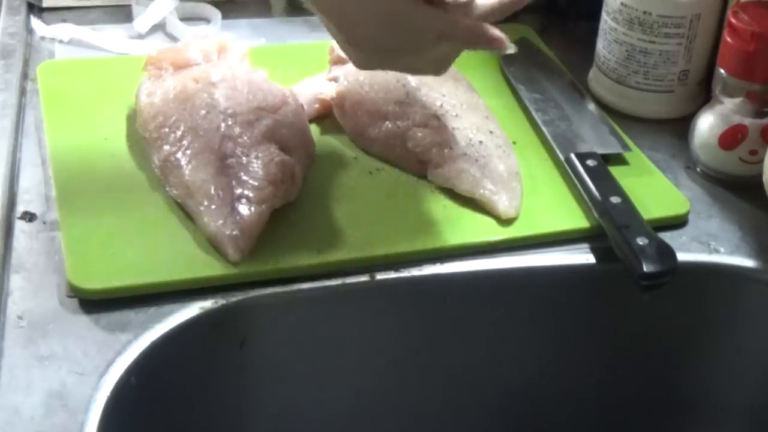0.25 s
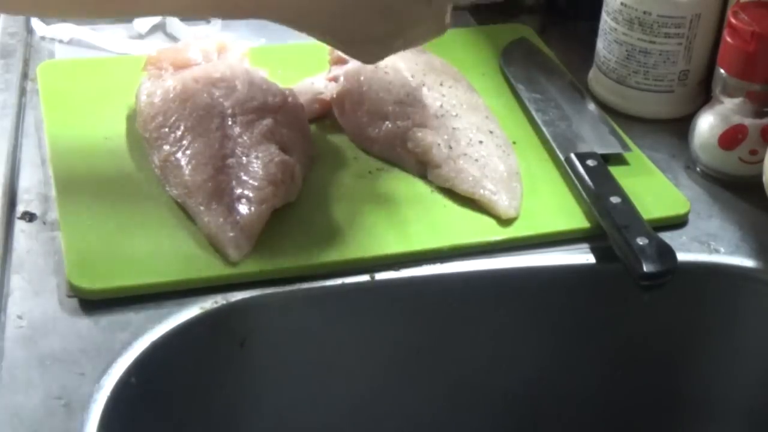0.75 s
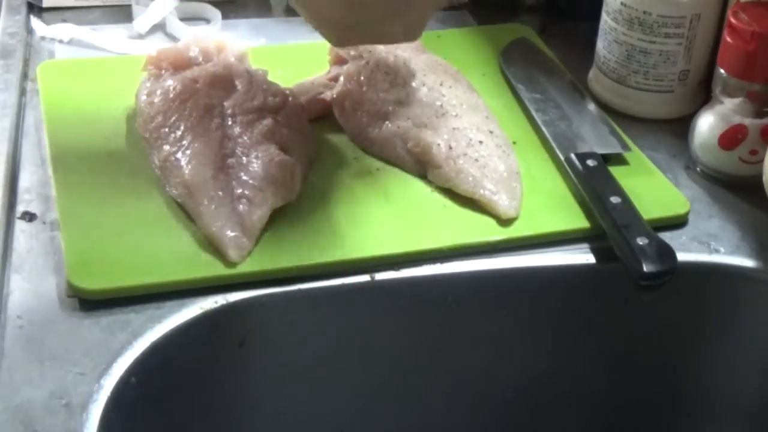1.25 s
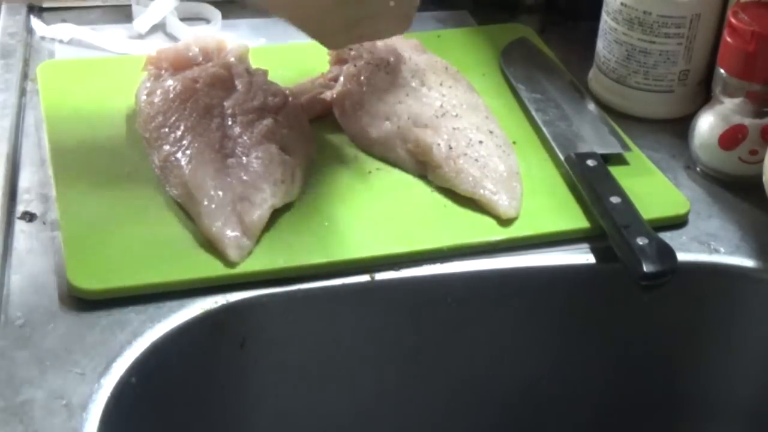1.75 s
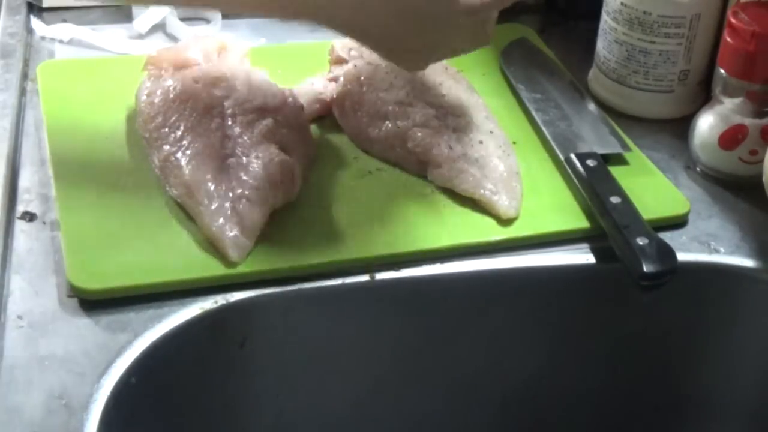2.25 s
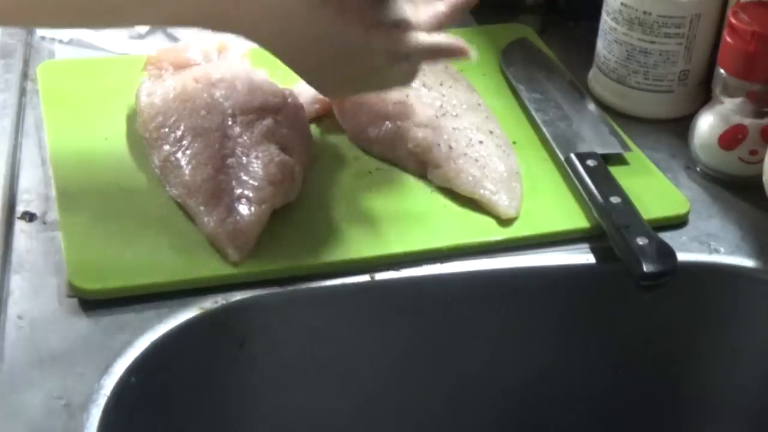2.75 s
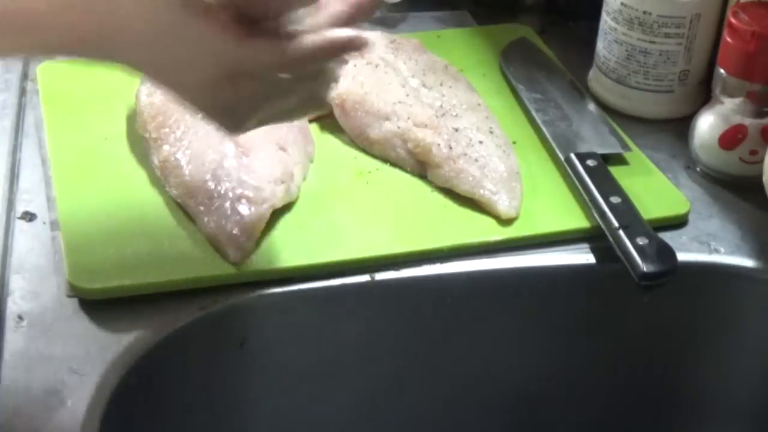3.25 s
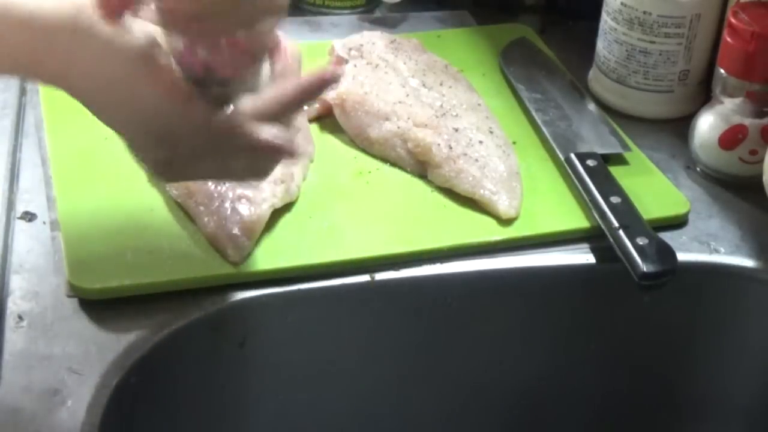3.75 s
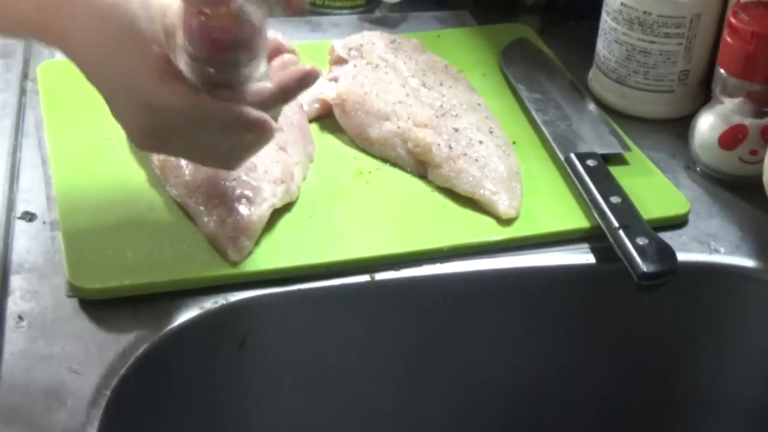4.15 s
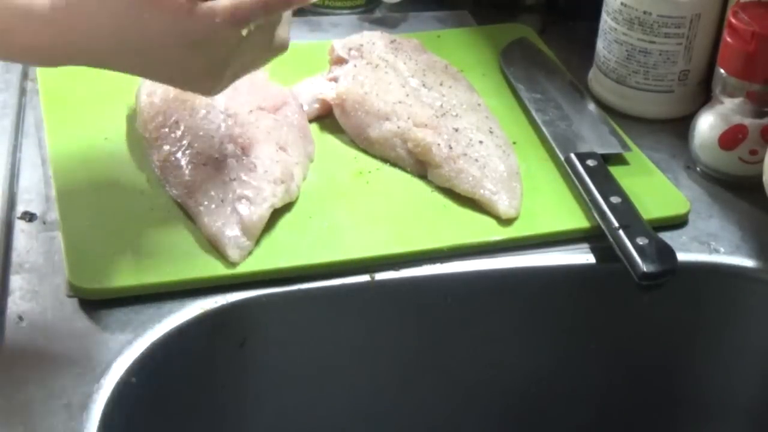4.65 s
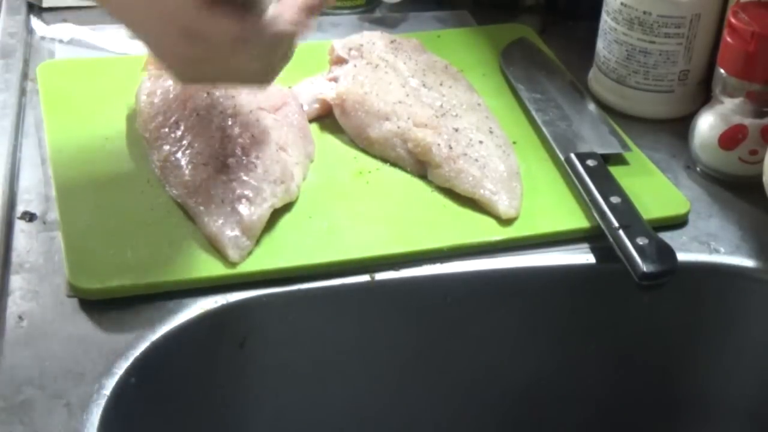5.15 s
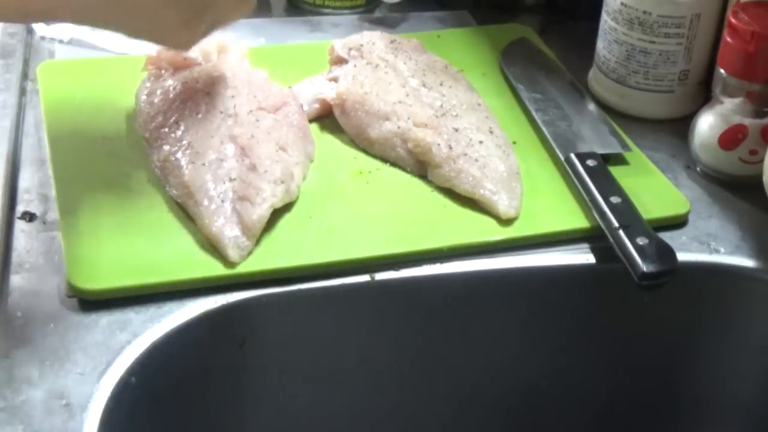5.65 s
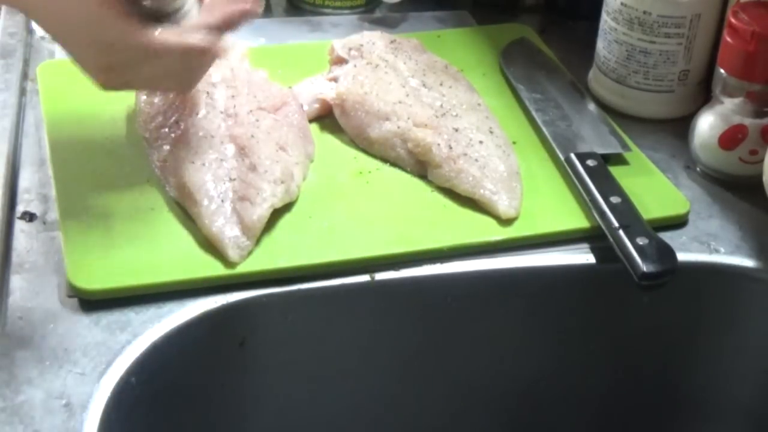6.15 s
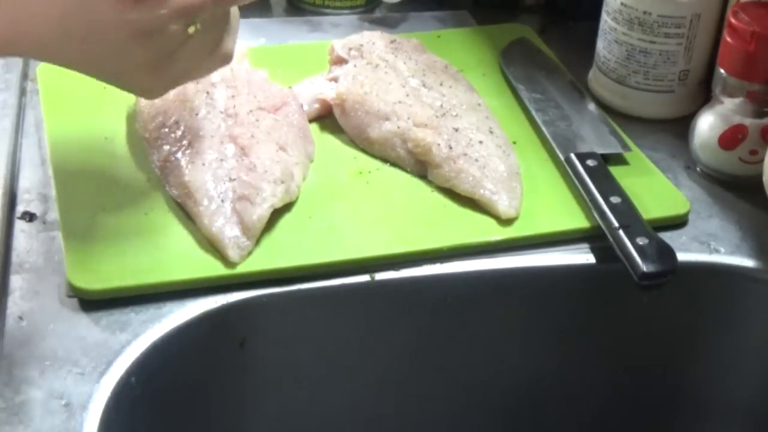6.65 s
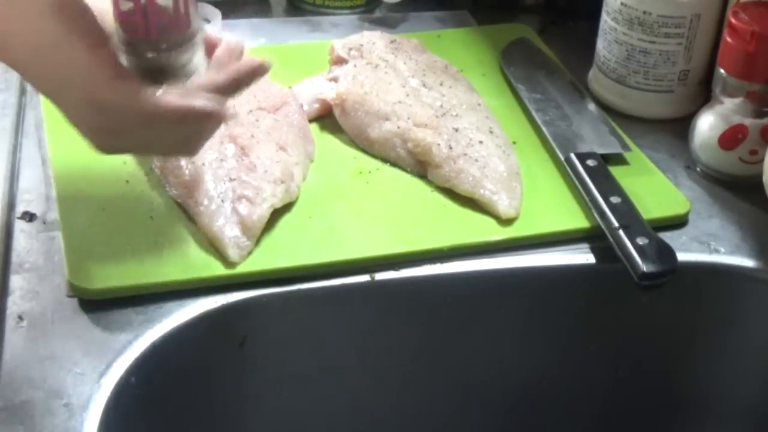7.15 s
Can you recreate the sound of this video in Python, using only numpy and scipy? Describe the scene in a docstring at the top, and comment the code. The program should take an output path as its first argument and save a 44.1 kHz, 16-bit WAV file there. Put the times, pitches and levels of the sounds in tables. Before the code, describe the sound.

A seasoning shaker rattles rhythmically from start to end. Hard grains pelt the inside of the can in crisp, high-pitched bursts under a tenth of a second long, then settle with stray ticks. In the first half, faint sliding leads into each stroke; later the gaps are cleaner and the strokes slightly slower. Close microphone, dry small kitchen, low hum and quiet air noise behind.

```python
"""A metal shaker can is shaken about three times a second over a kitchen counter.
From the start, filtered noise and a wavering appliance hum lie under soft stray ticks of grain.
Before each downstroke random impacts slide along the wall; a few grains click, or roll on a thin note.
Each downstroke pelts the end: noise bursts excite a bright wall and a hollow end and air cavity.
Grains then settle, one drops lightly, and at times the cap chinks; echoes and a short tail answer all."""
import sys
import numpy as np
from scipy import signal
from scipy.fft import rfft, irfft
from scipy.io import wavfile

SR = 44100
rng = np.random.default_rng(int(sys.argv[2]) if len(sys.argv) > 2 else 0)


def dump(signal):
    """Clip the signal to [-1, 1] and save it as 16-bit WAV at the path in sys.argv[1]."""
    limited = np.clip(np.atleast_2d(signal).T, -1, 1)
    pcm = np.round(limited * 32767).astype(np.int16)
    wavfile.write(sys.argv[1], SR, pcm)


N = 325879
T = np.arange(N) / SR  # time axis, s


def amp(db):
    """Level definition: decibels to an amplitude ratio."""
    return 10 ** (np.asarray(db) / 20)


def evened(x):
    """Power normalisation: scales to rms 1."""
    return x / np.sqrt(np.mean(x ** 2) + 1e-20)


def unit(x):
    """Energy normalisation: scales to energy 1."""
    return x / np.linalg.norm(x)


def read(points, hz):
    """Linear interpolation on a logarithmic frequency axis."""
    f, value = np.transpose(points)
    return np.interp(np.log(hz + 1), np.log(f), value)


def over_time(points):
    """Linear interpolation of a (t, value) table over the whole scene."""
    return np.interp(T, *np.transpose(points))


def add(mix, s, sound):
    """Superposition: mixes a sound in at time s, or at zero if s is negative."""
    part = mix[max(round(s * SR), 0):][:len(sound)]
    part += sound[:len(part)]


def through(x, response):
    """Linear filtering: convolution with an impulse response."""
    return signal.oaconvolve(x, response)[:N]


def colour(points, peaks=(), size=2048):
    """Minimum phase: a causal response of energy 1 from a spectrum and peaks (f/Hz, width/Hz, lift/dB)."""
    hz = abs(np.fft.fftfreq(size, 1 / SR))
    db = read(points, hz)
    for centre, width, lift in peaks:
        db = db + lift / (1 + (2 * (hz - centre) / width) ** 2)
    # the Hilbert transform of the log magnitude gives the phase
    log_spectrum = np.conj(signal.hilbert(np.log(amp(db))))
    return unit(np.fft.ifft(np.exp(log_spectrum)).real)


def moving(x, response, size=900):
    """Time-variant filtering: as the can moves and turns, its response fades into new random patterns."""
    out, padded = np.zeros(N + size), np.pad(x, (size, 2 * size))
    fade = np.sin(np.pi * np.arange(2 * size) / (2 * size))
    for i in range(0, N + size, size):
        block = padded[i:i + 2 * size] * fade
        add(out, i / SR, signal.fftconvolve(block, response()))
    return out[size:]


def whistle(hz, width_hz, n):
    """Random excitation of a resonance: a complex band of noise from a double-pole low-pass, shifted to hz, rms
    1."""
    r = np.exp(-np.pi * width_hz / SR)
    noise = rng.standard_normal(n) + 1j * rng.standard_normal(n)
    slow = signal.lfilter([1], [1, -2 * r, r * r], noise)
    return evened((slow * np.exp(2j * np.pi * hz * T[:n])).real)


def burst(decay, rise=0.00013, size=600):
    """High modal density: one hit is noise with a fast rise and an exponential decay (both s)."""
    t = T[:size]
    envelope = np.exp(-t / decay) * (1 - np.exp(-t / rise))
    return unit(rng.standard_normal(size) * envelope)


def pelting(length, per_s, spread_db):
    """Random impact process: grains at random moments with uneven force, rms 1."""
    n = max(round(length * SR), 100)
    chance, force = rng.random(n), rng.exponential(1, n)
    return evened((chance < per_s / SR) * amp(spread_db * np.minimum(force, 3)))


def strike(impacts, decay, count=120):
    """Position-dependent excitation: each impact lands on one of many spots of the can."""
    spot = rng.integers(0, count, N)
    bursts, out = [burst(decay) for _ in range(count)], np.zeros(N)
    for i in np.flatnonzero(impacts):
        add(out, i / SR, impacts[i] * bursts[spot[i]])
    return out


# spectrum of the room noise: (f/Hz, relative level per Hz/dB)
AIR_SPECTRUM = [(25, -23), (60, 0), (90, -8), (160, 0.5), (225, -8), (290, -0.5), (500, -12), (900, -6.5),
                (1500, -10), (3000, -16.5), (6000, -17.5), (10000, -12), (15000, -33)]
# partials of the appliance hum: (f/Hz, rms level before the swell/dB)
HUM_PARTIALS = [(58.1, -60), (116.1, -63.5), (622, -68.5), (725, -82)]
# slow swell of room noise and hum: (t/s, gain/dB)
BACKGROUND_SWELL = [(0, 3), (.8, -2), (2.2, -1.5), (3, 3.5), (4, 0.5), (7.4, 2.5)]


def background(air_db=-55.5, waver=0.024):
    """Noise shaping and phase modulation: soft room noise and a slightly wavering hum."""
    spectrum = rfft(rng.standard_normal(N)) * amp(read(AIR_SPECTRUM, np.fft.rfftfreq(N, 1 / SR)))
    air = evened(irfft(spectrum, N))
    drift = evened(sum(np.sin(2 * np.pi * (f * T + rng.random())) for f in np.geomspace(.2, 3, 12)))
    hum = np.zeros(N)
    for hz, db in HUM_PARTIALS:
        # waver is the rms phase excursion of the lowest partial, in radians
        wander = waver * np.sqrt(hz / HUM_PARTIALS[0][0]) * drift
        hum += amp(db) * evened(np.sin(2 * np.pi * (hz * T + rng.random()) + wander))
    return (amp(air_db) * air + hum) * amp(over_time(BACKGROUND_SWELL))


# course of the soft low rustle: (t/s, level/dB)
RUSTLE_LEVEL = [(0, -62), (.4, -56.5), (.7, -77), (1.9, -61.5), (2.6, -70), (4.4, -61.5), (6.3, -55.5),
                (6.8, -67), (7.4, -57)]


def rustle(low_hz=165, high_hz=290, high_db=-4):
    """Amplitude modulation of narrow-band noise: two dull bands rise and fall."""
    dull = evened(whistle(low_hz, 80, N) + amp(high_db) * whistle(high_hz, 92, N))
    return dull * amp(over_time(RUSTLE_LEVEL))


def stray_grains(wall_db=-54, hollow_db=-69):
    """Sparse random excitation: loose grains never quite rest and tick softly throughout."""
    ticks = pelting(N / SR, per_s=260, spread_db=5)
    return ticks * amp(wall_db), ticks * amp(hollow_db)


# downstrokes: (start t/s, end t/s, wall level/dB, hollow level/dB, build-up through the stroke/dB,
# level of the slide before it/dB, level of the opening hit/dB); levels are relative, before later gains
DOWNSTROKES = [(0.071, 0.156, -21.5, -32, -9, -36, -14.5), (0.364, 0.424, -22, -30.5, 2, -39.5, -13.5),
               (0.648, 0.731, -22.5, -32, 1.5, -38.5, -13), (0.95, 1.02, -23.5, -32.5, 5.5, -42.5, -17.5),
               (1.294, 1.342, -23, -35.5, -5.5, -42, -23), (1.597, 1.671, -27, -34, 2.5, -41, -18),
               (1.923, 1.999, -23.0, -31.5, 4, -41.5, -17), (2.235, 2.311, -24.5, -37.5, 3, -37.5, -14),
               (2.579, 2.668, -24.5, -34.0, 2.5, -39.5, -13), (2.945, 3.009, -23, -31, -5.5, -39, -18),
               (3.267, 3.347, -19.5, -34, -0.5, -37.0, -18), (3.607, 3.693, -20, -33.5, 1, -68, -20),
               (3.982, 4.036, -23.5, -30.0, -1.0, -56, -25), (4.273, 4.386, -22.5, -32.5, -2.5, -53, -14),
               (4.592, 4.69, -21, -31.5, 1, -71, -16), (4.913, 4.988, -20, -28.5, 3, -50, -19.5),
               (5.243, 5.332, -22.0, -28.5, -8.5, -72, -18.5), (5.549, 5.643, -22.0, -31.5, 5, -73, -12),
               (5.898, 5.991, -20.5, -31.5, -0.5, -65, -12.5), (6.226, 6.323, -23, -33.5, -0.5, -65, -10),
               (6.578, 6.667, -21.0, -31.5, 0.0, -63, -18), (6.91, 7.019, -21.5, -34.5, 2.5, -52.5, -15),
               (7.26, 7.338, -26, -35.5, 2.5, -74, -23)]
# the slide before each downstroke begins and ends this long ahead of it, s
SLIDE_FROM_S, SLIDE_UNTIL_S = .135, 0.043


def slides(wall_db=-0.5, hollow_db=-8.0):
    """Sliding friction as dense impacts: on the way back grains gather speed and run out."""
    out = np.zeros(N)
    for start, *_, slide_db, _ in DOWNSTROKES:
        begin = max(start - SLIDE_FROM_S, 0)
        hits = pelting(start - SLIDE_UNTIL_S - begin, per_s=1100, spread_db=5)
        add(out, begin, hits * signal.windows.tukey(len(hits), .25) * amp(slide_db))
    return out * amp(wall_db), out * amp(hollow_db)


def slide_hits(wall_db=7, hollow_db=-2, spread_db=3, count=2):
    """Isolated impacts: larger grains tick out of each slide; rows (t/s, wall/dB, hollow/dB)."""
    rows = []
    for start, *_, slide_db, _ in DOWNSTROKES:
        times_ahead = rng.uniform(SLIDE_UNTIL_S, SLIDE_FROM_S, count)
        sizes_db = spread_db * rng.standard_normal(count)
        for ahead, size in zip(times_ahead, sizes_db):
            if start > ahead:
                rows.append((start - ahead, slide_db + wall_db + size, slide_db + hollow_db + size))
    return rows


# tightening of the hand on the can: (t/s, grip from 0 loose to 1 tight)
HAND_GRIP = [(0, 0.056), (3.1, 0.25), (3.6, 1)]


def rolls(lead_s=.105, length_s=0.081, tight_db=-52, loose_db=-30):
    """Rolling contact as impacts: grains roll before each downstroke, much fainter with a loose grip."""
    out = np.zeros(N)
    for start, *_ in DOWNSTROKES:
        ticks = pelting(length_s, per_s=450, spread_db=4)
        looseness = 1 - np.interp(start, *np.transpose(HAND_GRIP))
        level = amp(tight_db + loose_db * looseness)
        add(out, start - lead_s, level * evened(ticks * np.hanning(len(ticks))))
    return out


# spectrum of a hit on the wall: (f/Hz, relative level/dB)
WALL_SPECTRUM = [(3500, -36.5), (5200, -15.5), (5950, -3), (7000, -0.5), (8000, 0), (9000, -1), (10200, -5),
                 (11800, -5.5), (13000, -10), (14000, -14), (15800, -16)]


def rolling_ticks(note_hz=6400, note_decay=0.0027, note_db=-1, scratch_db=-3):
    """Excitation of a single mode: rolling grains tick on one thin wall note, with a broad scratch."""
    rolling, t = rolls(), T[:SR // 40]
    note = unit(np.cos(2 * np.pi * note_hz * t) * np.exp(-t / note_decay))
    scratch = through(strike(rolling, decay=.0005), colour(WALL_SPECTRUM))
    return amp(note_db) * through(rolling, note) + amp(scratch_db) * scratch


# spectrum of a hit on the end of the can: (f/Hz, relative level/dB)
HOLLOW_SPECTRUM = [(100, -22.5), (250, -18), (430, -13), (540, -20), (800, -17), (1170, -14), (1500, -9.5),
                   (2000, -6.5), (2450, -2), (2900, -1.5), (3500, -1.5), (4400, -5), (5300, -6),
                   (8000, -22)]
# resonances of the air in the can: (f/Hz, width/Hz, lift with loose grip/dB, lift with tight grip/dB)
AIR_CAVITY = [(730, 43, 7.5, 10.5), (966, 200, 7, 10.5), (1382, 200, 7, 5.5), (1718, 76, 8, 3.5),
              (1940, 410, 8, 2.5), (2684, 85, 10, 6), (3020, 116, 7, 6), (3346, 140, 7, 3),
              (3620, 59, 8.5, -1), (3920, 110, 6.5, 1.5)]


def can(wall, hollow, ring_t60=0.05, ring_db=-6):
    """Modal decay and cavity resonance: the wall rings in many close modes, the end drives the air."""
    t = T[:SR // 14]
    dying = amp(-60 * t / ring_t60)
    ring = moving(wall, lambda: unit(rng.standard_normal(len(t)) * dying), size=650)
    bright = through(wall + amp(ring_db) * ring, colour(WALL_SPECTRUM))
    grip = np.clip(over_time(HAND_GRIP), 0, 1)
    loose = colour(HOLLOW_SPECTRUM, [(hz, width, db) for hz, width, db, _ in AIR_CAVITY])
    tight = colour(HOLLOW_SPECTRUM, [(hz, width, db) for hz, width, _, db in AIR_CAVITY])
    return bright + through(hollow * (1 - grip), loose) + through(hollow * grip, tight)


def reflections():
    """Specular reflection: a few echoes from counter and wall, with random delay and sign."""
    early = np.zeros(SR // 40)
    early[rng.integers(SR // 400, len(early), 10)] = rng.choice([-1., 1.], 10)
    return unit(early)


# reverberation time of the kitchen: (f/Hz, t60/s)
KITCHEN_T60 = [(300, 0.35), (1500, 0.18), (4000, 0.19), (7000, 0.21), (11000, 0.15), (16000, 0.11)]


def reverberation(build_up=0.0029):
    """Diffuse-field decay: noise dies exponentially at a rate set for each frequency."""
    hz, t, bands = signal.stft(rng.standard_normal(SR // 4), SR, nperseg=256)
    decay = amp(-60 * t / read(KITCHEN_T60, hz)[:, None])
    tail = signal.istft(bands * decay, SR, nperseg=256)[1]
    return unit(tail * np.minimum(T[:len(tail)] / build_up, 1))


def kitchen(x, early_db=-14, tail_db=-11):
    """Room response: the sum of direct sound, first echoes and diffuse tail."""
    early = moving(x, reflections, size=1100)
    tail = moving(x, reverberation, size=2800)
    return x + amp(early_db) * early + amp(tail_db) * tail


# large grains that stand out, mostly on the way back: (t/s, wall level/dB, hollow level/dB),
# relative levels
LARGE_GRAINS = [(0.0593, -21, -31), (0.209, -17, -33), (0.2568, -25.5, -32), (0.353, -20, -30),
                (0.4239, -26, -19.5), (0.54, -22.5, -44), (0.7038, -22, -18.5), (0.8378, -19.5, -29),
                (0.8528, -26, -41), (1.15, -26, -35.5), (1.2104, -24, -37), (1.2849, -25.5, -29.5),
                (1.3307, -17.5, -37), (1.3948, -18, -42), (1.524, -23.5, -37), (1.6644, -18, -21),
                (1.7635, -32, -37), (1.7858, -15, -21.5), (1.83, -21, -34), (2.1211, -25.5, -47),
                (2.134, -21, -36), (2.178, -13.5, -27), (2.2292, -20, -43), (2.3062, -17.5, -43),
                (2.3938, -32, -55), (2.449, -12, -30.5), (2.545, -27, -30.5), (2.717, -33, -42),
                (2.927, -15.5, -33), (3.004, -13, -39), (3.1561, -23.5, -22), (3.5914, -25.5, -35),
                (3.7848, -23, -32), (3.799, -27, -32.5), (3.841, -32, -42), (3.8999, -15.5, -30),
                (3.9393, -11, -23), (3.9843, -15.5, -11.5), (4.168, -26.5, -35), (4.3764, -17, -25),
                (5.221, -27.5, -27.5), (5.2446, -20, -19.5), (5.8133, -25.5, -34), (5.904, -16, -36),
                (5.9777, -15, -25), (6.078, -21, -31), (6.3982, -32, -37), (6.4037, -11, -33),
                (6.5, -32.5, -59), (6.6605, -13, -38), (6.9714, -15, -18), (7.077, -26.5, -40.5),
                (7.244, -25.5, -33.5), (7.2765, -16, -22)]


def hard_hits(wall_db=20.0, hollow_db=17.0):
    """Impulsive excitation: large grains strike one by one, driving both wall and end."""
    wall, hollow = np.zeros((2, N))
    for s, bright_db, end_db in LARGE_GRAINS + stroke_hits() + return_hits() + slide_hits():
        add(wall, s, amp(bright_db + wall_db) * burst(decay=0.0037))
        add(hollow, s, amp(end_db + hollow_db) * burst(decay=0.0047))
    return wall, hollow


def clumped(hits, clump_s, depth_db):
    """Random level modulation: grains arrive in uneven clumps; rms 1."""
    knots = np.arange(0, len(hits) / SR + clump_s, clump_s)
    level_db = depth_db * np.interp(T[:len(hits)], knots, rng.standard_normal(len(knots)))
    return evened(hits * amp(level_db))


def stroke_gain(t, length, build_db, settle):
    """Growth and decay: the gain builds or fades as grains arrive, then dies as they settle."""
    build = amp(build_db * np.clip(2 * t / length - 1, -.5, .5))
    return build * np.exp(-2 * np.maximum(t - length, 0) / settle)


def grain_flow(settle=0.0095, shake_db=-0.5, lead=0.008, lead_db=-15):
    """Granular impact: the mass arrives with each stroke and settles; returns drive of wall and end."""
    wall, hollow = np.zeros((2, N))
    for start, end, wall_db, end_db, build_db, *_ in DOWNSTROKES:
        hits = pelting(end - start + 3 * settle, per_s=1000, spread_db=5.5)
        hits = clumped(hits, clump_s=0.00702, depth_db=1.5)
        hits = hits * stroke_gain(T[:len(hits)], end - start, build_db, settle)
        add(wall, start, hits * amp(wall_db + shake_db))
        add(hollow, start, hits * amp(end_db))
        # a few light grains run ahead of the mass
        first = pelting(lead, per_s=4200, spread_db=4) * amp(lead_db)
        add(wall, start - lead, first * amp(wall_db))
        add(hollow, start - lead, first * amp(end_db))
    slide_wall, slide_hollow = slides()
    stray_wall, stray_hollow = stray_grains()
    wall_drive = strike(wall + slide_wall + stray_wall, decay=0.0015)
    return wall_drive, strike(hollow + slide_hollow + stray_hollow, decay=0.002)


def stroke_hits(first_wall_db=2.0, first_hollow_db=-1.5, later_wall_db=5, later_hollow_db=-1,
                spread_db=2.5, count=3):
    """Isolated impacts: one opens each stroke, more land within it; rows (t/s, wall/dB, hollow/dB)."""
    rows = []
    for start, end, wall_db, end_db, build_db, _, opening_db in DOWNSTROKES:
        rows.append((start, opening_db + first_wall_db, end_db + first_hollow_db - build_db / 2))
        for share in (np.arange(count) + rng.uniform(.5, 1, count)) / count:
            bright, dull = spread_db * rng.standard_normal(2) + build_db * (share - .5)
            s = start + share * (end - start)
            rows.append((s, wall_db + later_wall_db + bright, end_db + later_hollow_db + dull))
    return rows


def return_hits(after_s=.075, wall_db=-36, hollow_db=-43, spread_db=3):
    """Inertia: as the can turns back one grain drops lightly; rows (t/s, wall/dB, hollow/dB)."""
    rows = []
    for _, end, *_ in DOWNSTROKES:
        late, size = rng.standard_normal(2)
        s = end + after_s * np.exp(.2 * late)
        rows.append((s, wall_db + spread_db * size, hollow_db + spread_db * size))
    return rows


# chinks of the cap and the end of the can: (t/s, f/Hz, relative level/dB)
CAP_CHINKS = [(.382, 3530, -31), (.402, 3500, -23), (1.395, 4220, -28), (1.395, 2730, -27.5),
              (1.786, 3380, -21), (2.393, 1890, -35), (2.928, 4770, -32), (2.95, 3540, -17.5),
              (3.785, 4730, -33.5), (4.149, 4700, -45), (5.549, 4820, -22), (5.96, 3100, -19),
              (6.612, 3020, -23.5)]


def chinks(decay=0.0036, gain_db=21.5):
    """Damped resonance: the cap and the end chink as narrow bands of noise that die quickly."""
    out, t = np.zeros(N), T[:SR // 40]
    for s, hz, db in CAP_CHINKS:
        chink = unit(whistle(hz, 760, len(t)) * np.exp(-t / decay))
        add(out, s, amp(db + gain_db) * chink)
    return out


def scene():
    """Source, resonator and room: grains drive the can, which sounds in the kitchen."""
    flow_wall, flow_hollow = grain_flow()
    hit_wall, hit_hollow = hard_hits()
    shaker = can(flow_wall + hit_wall, flow_hollow + hit_hollow) + rolling_ticks() + chinks()
    return (background() + rustle() + kitchen(shaker))[None]


def record(dry, ceiling=.72, edge_hz=15850):
    """Saturation and band limiting: tanh rounds off the sharpest peaks, then a low-pass follows."""
    rounded = ceiling * np.tanh(dry / ceiling)
    low_pass = signal.firwin(401, edge_hz, window=("kaiser", 8), fs=SR)
    return signal.oaconvolve(rounded, low_pass[None], "same")


dry = scene()
out = record(dry)
dump(out)
```